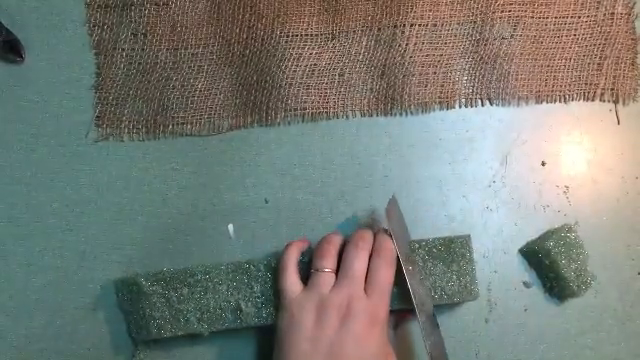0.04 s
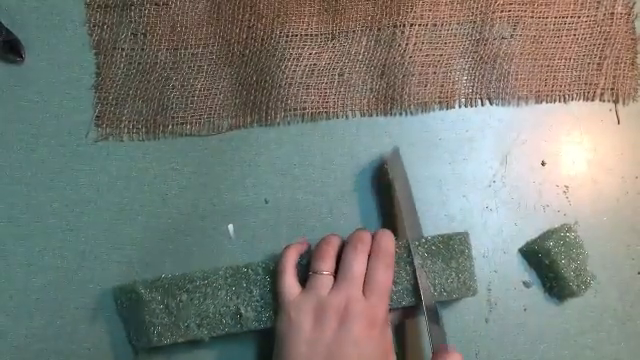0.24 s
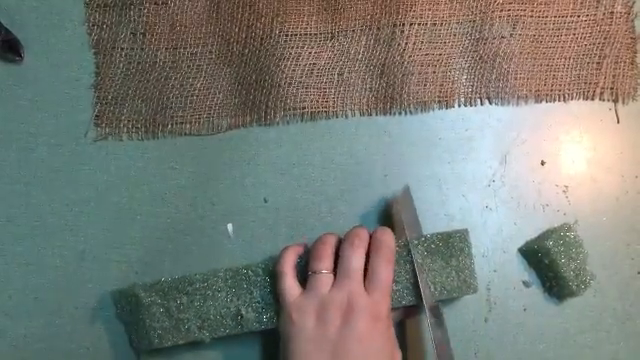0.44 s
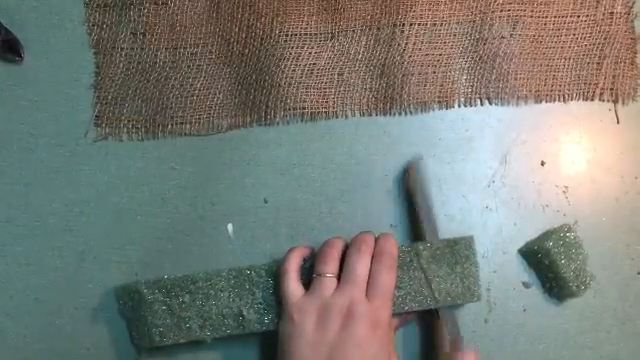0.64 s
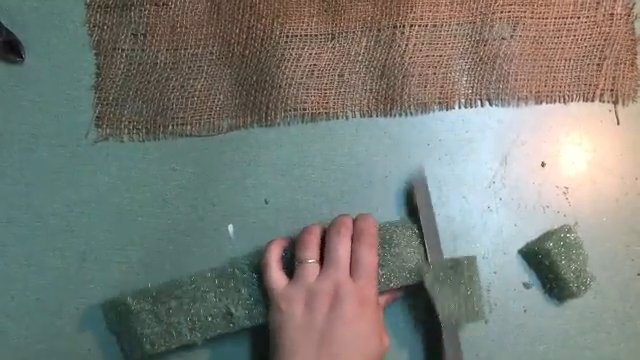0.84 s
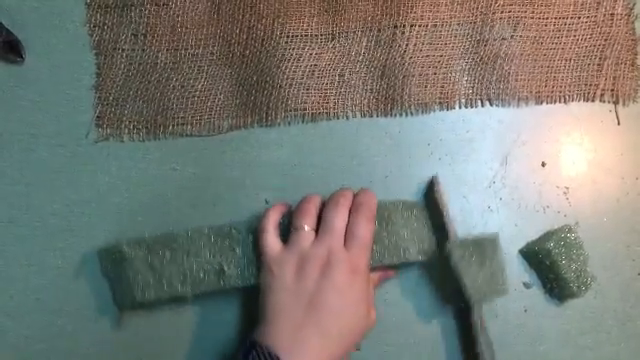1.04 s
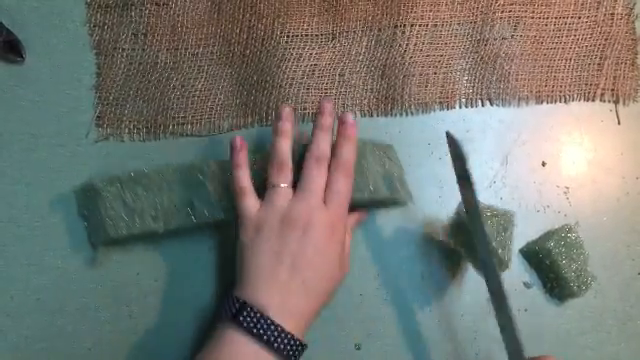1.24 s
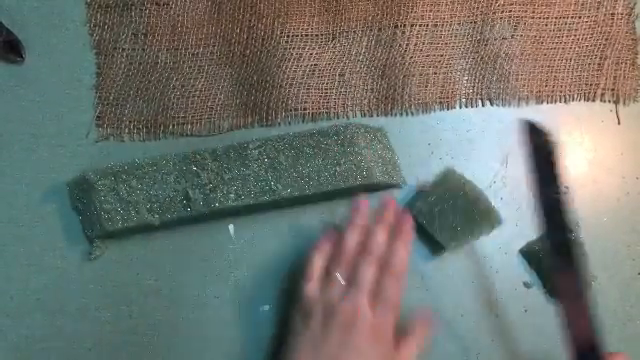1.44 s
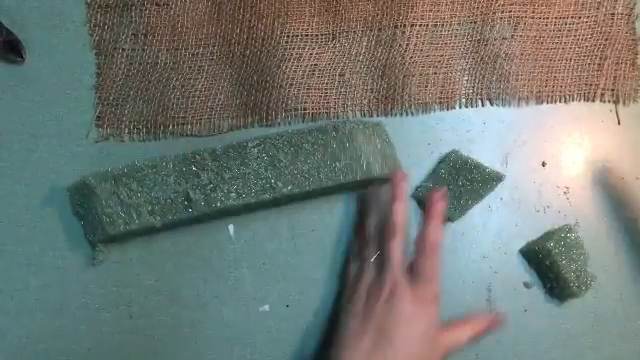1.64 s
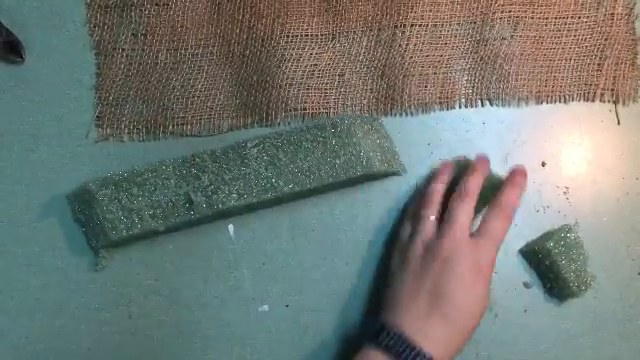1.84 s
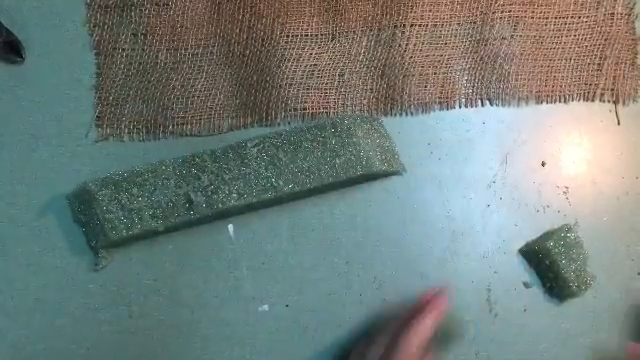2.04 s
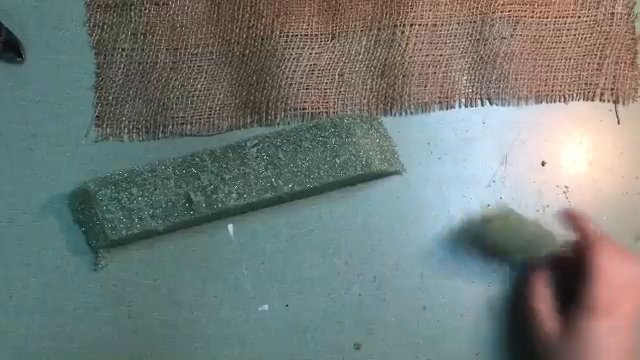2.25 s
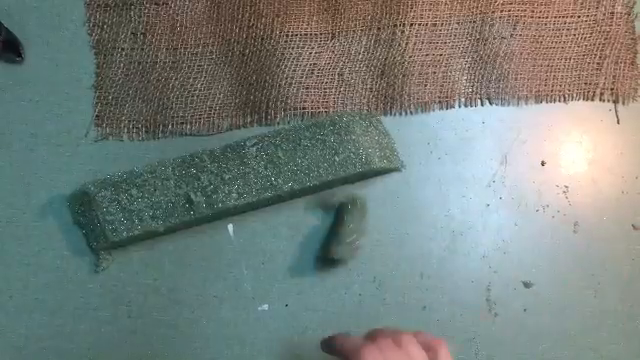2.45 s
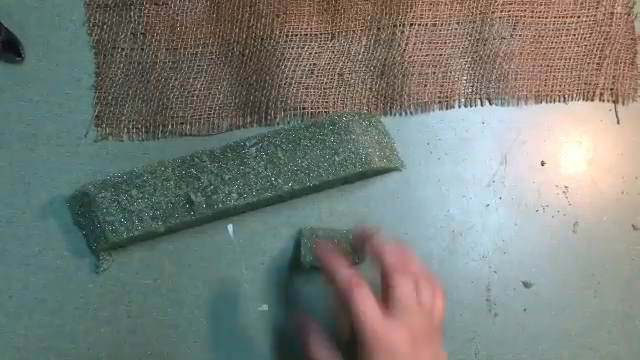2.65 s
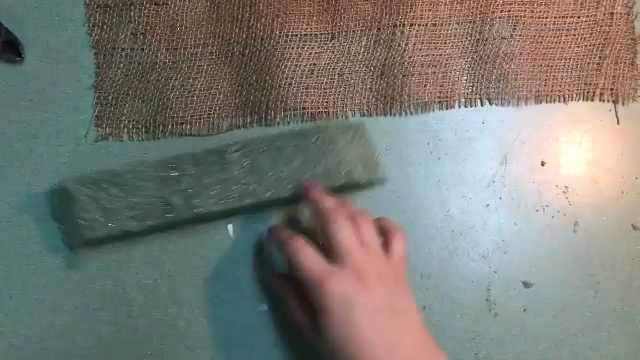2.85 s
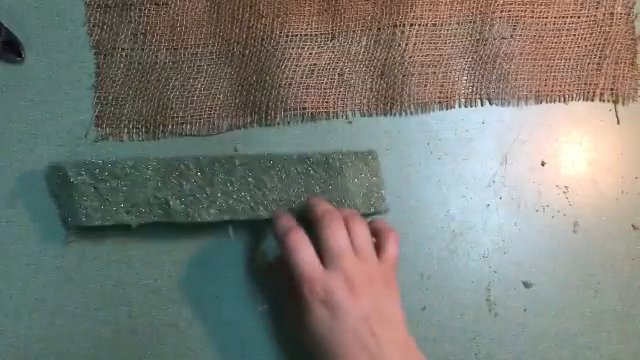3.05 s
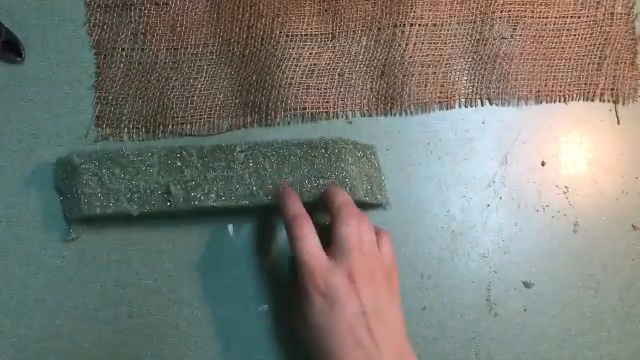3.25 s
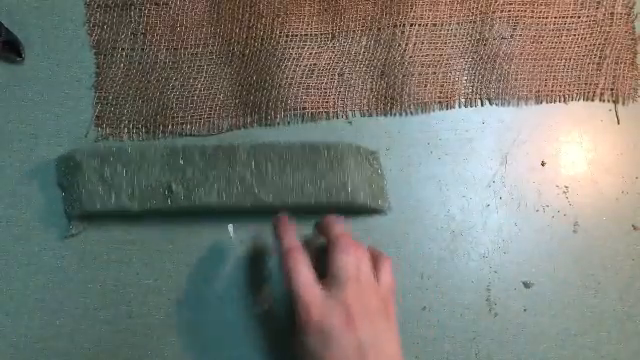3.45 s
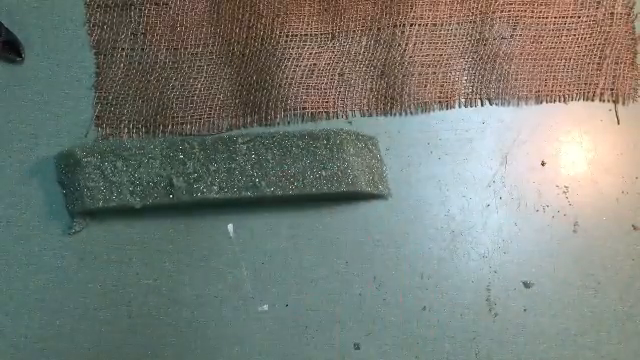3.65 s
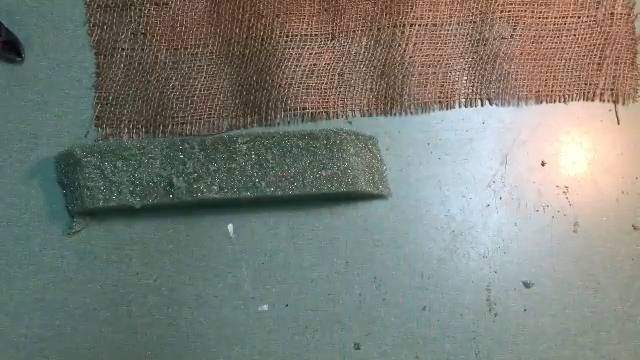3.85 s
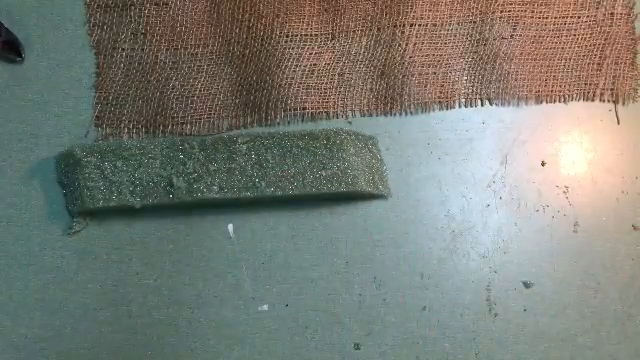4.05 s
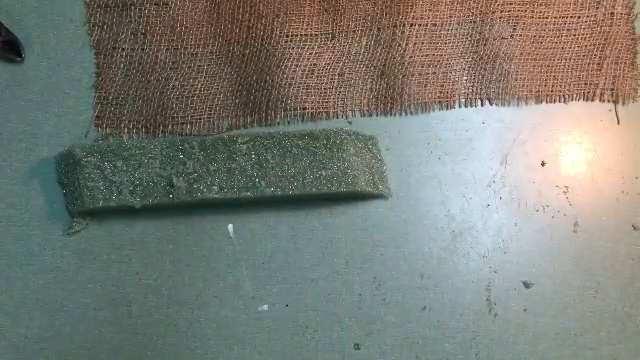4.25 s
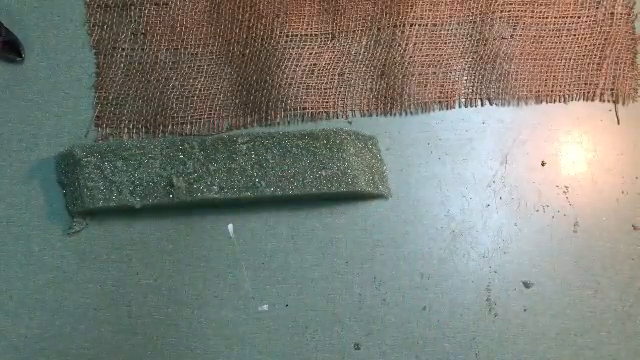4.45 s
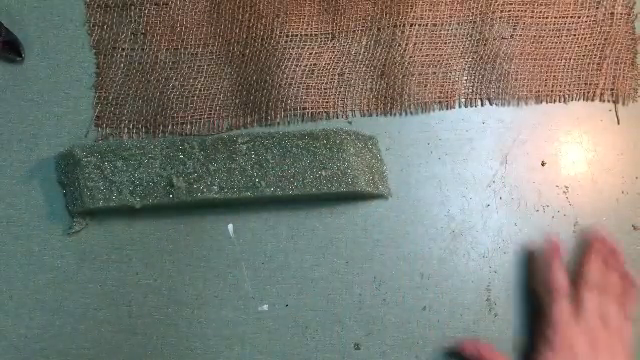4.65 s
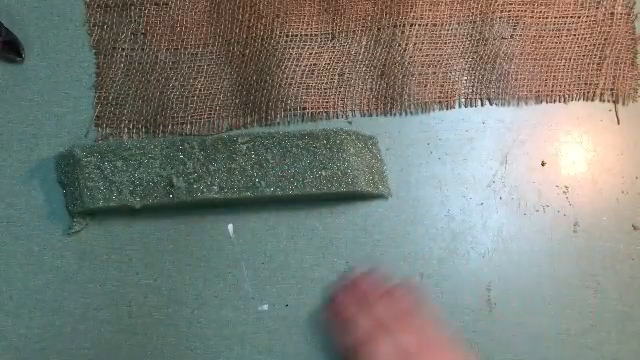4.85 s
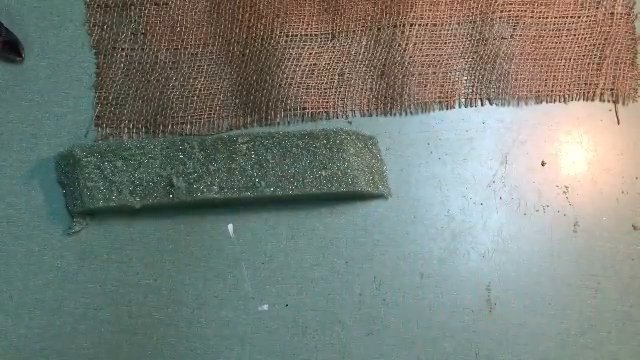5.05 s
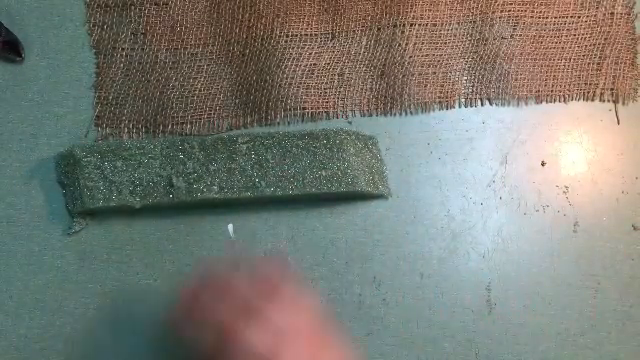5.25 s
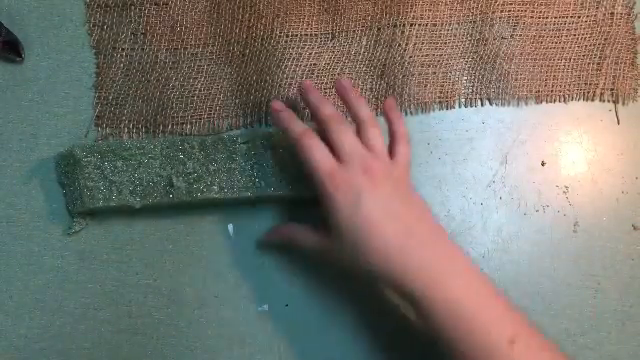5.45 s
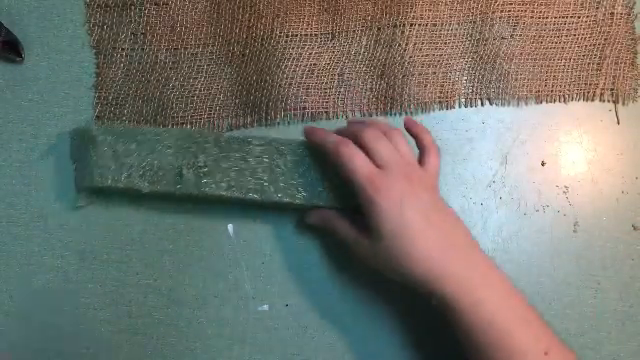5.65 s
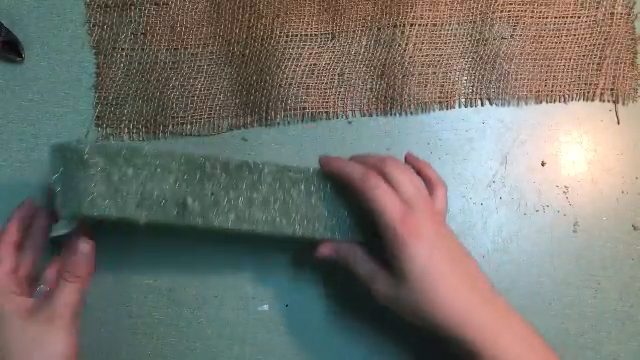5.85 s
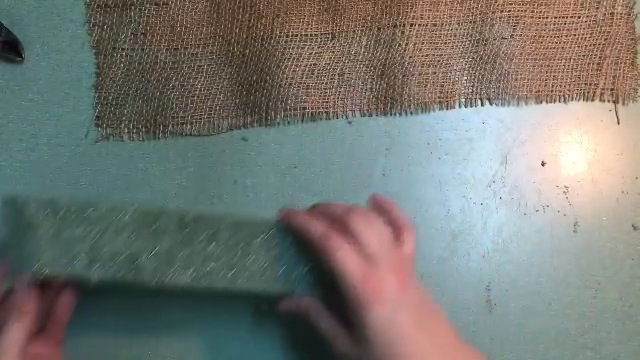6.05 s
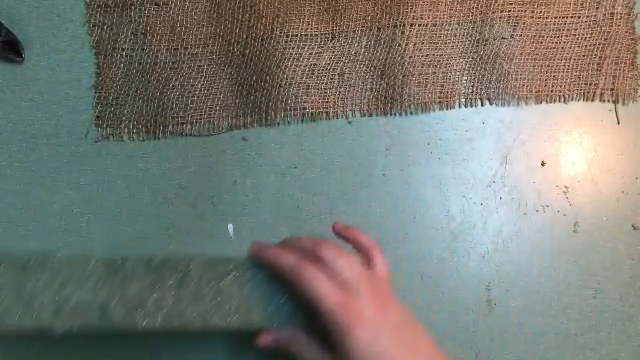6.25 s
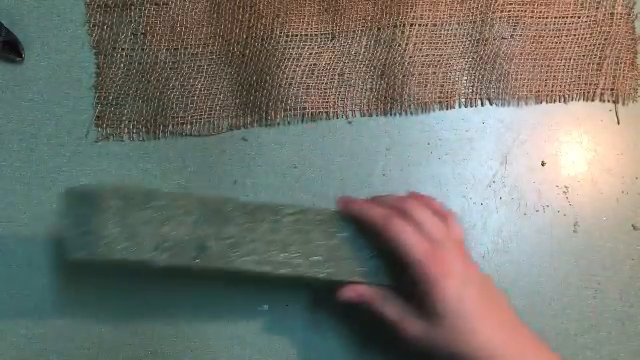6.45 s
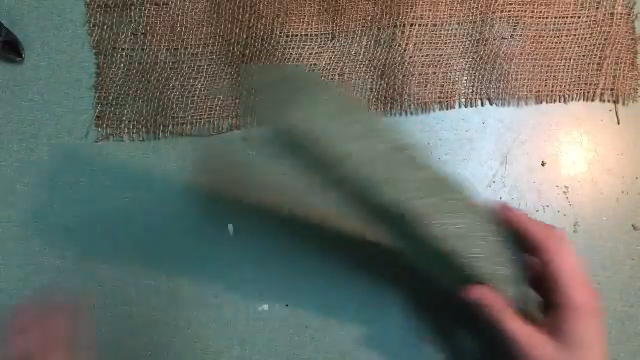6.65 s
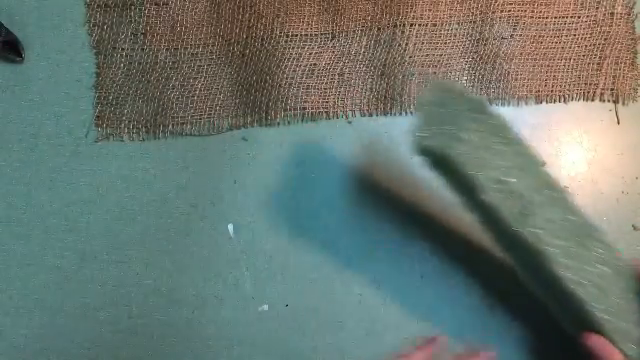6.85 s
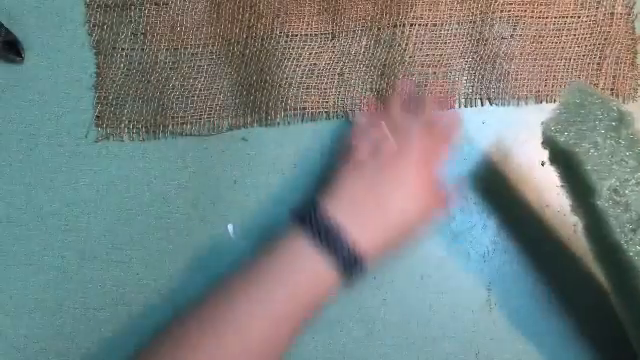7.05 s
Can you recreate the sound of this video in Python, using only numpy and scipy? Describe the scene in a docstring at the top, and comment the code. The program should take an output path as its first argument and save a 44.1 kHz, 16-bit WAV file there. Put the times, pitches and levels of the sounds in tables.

```python
"""A serrated knife saws through brittle craft foam on a table, close to the microphone in a quiet room:
bursts of noise for breaking cells crackle and sound the cut faces and the whole block, over a shaking table.
Room tone runs throughout and dips briefly after one second. Small hard taps ring, first near 1.8 s.
Just after 2 s the knife drops and rattles to rest: ringing modes of handle and blade, with noise scrapes.
Then hands sweep crumbs, slide pieces and bump the table: more foam noise, and decaying low sines."""
import sys
import numpy as np
from scipy import signal
from scipy.fft import rfft, irfft, next_fast_len
from scipy.io import wavfile
from scipy.ndimage import uniform_filter1d, map_coordinates

SR = 44100
rng = np.random.default_rng(int(sys.argv[2]) if len(sys.argv) > 2 else 0)


def output_pcm(signal):
    """Save a mono or channel-first signal as 16-bit PCM at the path in sys.argv[1].

    Samples are clipped to [-1, 1] before scaling.
    """
    pcm = np.clip(np.atleast_2d(signal).T, -1, 1) * 32767
    wavfile.write(sys.argv[1], SR, np.round(pcm).astype(np.int16))


N = 313551  # samples

# the dropped knife's main contacts, relative levels:
# (time [s], handle level [dB], blade level [dB], scrape level [dB])
DROP_CONTACTS = [(2.036, -53.5, -44, -36.5), (2.103, -11.5, -39, -24.5), (2.111, -27, -48.5, -41),
                 (2.142, -35, -21, -26), (2.147, -29, -16.5, -28.5), (2.151, -20.5, -38, -31),
                 (2.173, -23.5, -54.5, -49.5)]
# spectrum of the shaken table top: (frequency [Hz], density [dB per Hz])
TABLE_SPECTRUM = [(18, -51.5), (30, -17), (53, -18.5), (86, 3.5), (130, -2), (189, -1), (444, -7),
                  (600, -5.5), (780, -30), (1320, -120)]


def amp(db):
    """Gain of a level in dB."""
    return 10 ** (np.asarray(db) / 20)


def unit(x):
    """Scaled to rms 1."""
    return x / np.sqrt(np.mean(x ** 2) + 1e-20)


def along(points, hz):
    """Values at hz, read from (Hz, value) points on a log frequency axis."""
    f, values = np.transpose(points)
    return np.interp(np.log(hz + 1), np.log(f + 1), values)


def curves(rows):
    """One value per sample for each column after the time."""
    times, *columns = np.transpose(rows)
    return [np.interp(np.arange(N) / SR, times, column) for column in columns]


def wobble(rate):
    """A smooth random curve, rate knots a second."""
    knots = rng.standard_normal(int(N * rate / SR) + 4)
    return map_coordinates(knots, [np.arange(N) * rate / SR])


def colour(x, spectrum):
    """Causal minimum-phase filter of unit energy with the given spectrum."""
    size = 4096
    level_db = np.maximum(along(spectrum, np.fft.rfftfreq(size, 1 / SR)), -70)
    cepstrum = irfft(np.log(amp(level_db)))
    # folding the cepstrum forward puts the energy as early as possible
    cepstrum[1:size // 2] *= 2
    cepstrum[size // 2 + 1:] = 0
    kernel = irfft(np.exp(rfft(cepstrum)))
    return signal.fftconvolve(x, kernel / np.linalg.norm(kernel))[:len(x)]


def grit(rate, spread_db, t60, smooth):
    """Noise in bursts: each of rate cells a second breaks sharply and dies fast, over a smooth hiss."""
    draw = rng.random((2, N))
    strength = amp(-spread_db * np.log(draw[1] + 1e-4))
    cells = (draw[0] < rate / SR) * strength
    bursts = signal.lfilter([1], [1, -amp(-60 / (t60 * SR))], cells)
    return unit((unit(bursts) + smooth) * rng.standard_normal(N))


def ring(modes, t, scatter_db):
    """Sum of decaying sines: the modes of a struck body, each at a new random strength."""
    total = np.zeros(len(t))
    for hz, db, t60 in modes:
        level_db = db + scatter_db * rng.standard_normal()
        total += amp(level_db - 60 * t / t60) * np.sin(2 * np.pi * hz * t)
    return total


def patchy(x, depth_db):
    """Random gain over patches of time and frequency, so the texture keeps changing."""
    z = signal.stft(x, nperseg=512)[2]
    field = rng.standard_normal(z.shape)
    field = uniform_filter1d(field, size=3, axis=0)  # across frequency
    field = uniform_filter1d(field, size=8, axis=1)  # across time
    gain = amp(depth_db * unit(field))
    return signal.istft(z * unit(gain), nperseg=512)[1][:len(x)]


def room(x):
    """The walls' answer: a noise tail in which each frequency dies at its own speed."""
    # decay of the room: (frequency [Hz], t60 [s])
    wall_decay = [(150, 0.37), (1500, 0.32), (5000, 0.063), (14000, 0.31)]
    hz, t, z = signal.stft(rng.standard_normal(SR // 2), SR, nperseg=256)
    decay = amp(-60 * t / along(wall_decay, hz)[:, None])
    tail = signal.istft(z * decay, SR, nperseg=256)[1]
    delayed = np.pad(x, (200, 0))  # samples before the answer
    return signal.fftconvolve(delayed, tail / np.linalg.norm(tail))[:N]


def room_tone():
    """The quiet room: coloured noise at a gently wavering level that dips briefly."""
    # spectrum of the room tone: (frequency [Hz], density [dB per Hz])
    air_spectrum = [(15, -41), (25, -6.5), (139, -2), (244, -11), (396, -10), (532, -15.5), (817, -19),
                    (2390, -23.5), (2590, -28), (3210, -24.5), (10400, -35), (12900, -32), (15200, -44.5)]
    # brief dip of the room tone: (time [s], level [dB])
    dip = [(0, 0), (1.0, 0), (1.12, -6), (1.3, -6), (1.37, -20), (1.42, -16), (1.47, 0)]
    level_db = -66.8 + curves(dip)[0] + 1.1 * wobble(12.0)
    return amp(level_db) * colour(rng.standard_normal(N), air_spectrum)


def contact_db():
    """Levels of crackle, cut faces and block: each movement against the foam rises, holds and falls."""
    # movements of blade, hand or piece against the foam, relative levels: (start [s], rise [s], hold [s],
    # fall [s], crackle level as the hold starts [dB], crackle level as it ends [dB],
    # cut faces over crackle [dB], whole block over crackle [dB])
    rubs = [(0, 0.00058, 0.1, .02, -58, -53, 2.5, -11.5), (.088, 0.0038, .001, 0.054, -38, -36.5, 1, -3),
            (0.157, 0.0082, 0.074, 0.049, -31, -22.5, 3.5, -9),
            (0.198, 0.065, 0.16, 0.058, -22, -19.5, 1, -7.5),
            (.46, 0.022, 0.053, .02, -55, -50.5, 3.5, -13), (0.529, 0.011, .001, .04, -25.5, -36, 1, -11),
            (.535, 0.01, 0.064, 0.22, -38, -34, -1.5, -11),
            (0.721, 0.0052, 0.026, 0.023, -55, -20.5, 5.5, -12),
            (0.738, 0.015, 0.031, 0.026, -20, -14.5, -3, -6.5),
            (.765, 0.028, 0.099, .04, -15, -15.5, -1.5, -7.5), (.92, 0.016, 0.046, .02, -39.5, -39, 3, -12),
            (.97, 0.027, .001, 0.057, -23.5, -23.5, -2.5, -13),
            (1.0, .03, 0.037, 0.087, -34.5, -29.5, -3, -9), (1.09, 0.019, .001, 0.11, -27, -32.5, 3.5, -24),
            (1.109, 0.044, 0.11, 0.16, -32.5, -37, 2.5, -18),
            (1.26, 0.028, 0.15, 0.089, -37, -48.5, -3, -27),
            (1.458, .034, 0.00089, 0.027, -37.5, -49, 2.5, -0.5),
            (1.499, 0.0072, 0.25, 0.041, -64, -65.5, -4, -6.5),
            (1.73, 0.022, .001, .016, -41.5, -48, -17, -27.5),
            (1.77, 0.032, 0.00091, 0.011, -51, -48, -19.5, -22),
            (1.795, 0.018, 0.0011, 0.017, -41.5, -45, 5, -14.5),
            (1.81, 0.02, 0.13, 0.034, -54.5, -69, 1, -12.5), (1.941, 0.042, .044, .02, -45, -52.5, -4, -13),
            (2.028, 0.011, .022, 0.13, -21, -35.5, -6.5, -19),
            (2.262, 0.013, 0.0055, .02, -48.5, -48.5, -13.5, 0.5),
            (2.297, .01, .012, 0.049, -44, -48.5, -17, -9.5),
            (2.35, 0.0093, 0.0069, .03, -32, -41, -14, -27),
            (2.38, 0.0072, 0.015, 0.035, -27, -36, -4, -14.5),
            (2.44, 0.081, 0.00089, .012, -50, -49.5, -7, -20.5),
            (2.52, 0.05, 0.00095, 0.067, -45, -47, -1.5, -12.5),
            (2.56, 0.05, 0.12, 0.18, -50, -59, -13, -26.5),
            (2.955, .011, 0.06, 0.17, -48, -44.5, -6.5, -25.5),
            (3.1, 0.1, .001, 0.063, -51.5, -48.5, -1, -12.5),
            (3.2, 0.055, 0.059, 0.11, -41.5, -52, -2, -15.5), (3.4, 0.056, 0.08, 0.18, -49.5, -50, -8, -28),
            (3.6, 0.032, 0.093, 0.045, -60.5, -53, -5.5, -27),
            (3.875, 0.038, 0.063, 0.056, -59.5, -52.5, -14, -29.5),
            (4.244, 0.019, .2, 0.053, -61, -77, -5, -11), (4.468, 0.028, .001, 0.14, -58.5, -60, 2, -13),
            (4.64, 0.063, 0.0012, 0.093, -62, -62, -0.5, -14),
            (4.75, 0.038, .08, .05, -59.5, -63, 0.5, -15),
            (4.85, 0.031, 0.14, 0.13, -60, -55.5, 4.5, -17.5),
            (5.0, 0.037, 0.12, 0.09, -56, -61.5, -0.5, -10), (5.5, 0.045, .001, .06, -77, -79.5, 17, 14),
            (5.638, 0.029, 0.00095, 0.033, -62.5, -60.5, 7, -10.5),
            (5.716, 0.026, 0.17, 0.023, -45.5, -55.5, -2, -21),
            (5.9, 0.047, .06, 0.058, -66, -72.5, -3.5, -6),
            (6.035, 0.068, 0.0011, 0.076, -58, -61.5, 3.5, -9),
            (6.154, 0.049, 0.075, .03, -39.5, -48, -3.5, -17),
            (6.26, 0.029, .001, 0.066, -34, -34, -1.5, -21),
            (6.4, 0.098, .001, 0.059, -62.5, -64.5, -10.5, -16.5),
            (6.73, 0.038, 0.00092, 0.042, -51.5, -51, -9, -20), (6.799, 0.1, .001, .02, -60, -59, -20, -22),
            (6.916, 0.036, .001, 0.15, -58, -56.5, -5, -27.5)]
    ramp_db = 30  # how far a rise climbs and a fall drops
    t, power = np.arange(N) / SR, np.full((3, N), 1e-12)
    for start, rise, hold, fall, first_db, last_db, faces_db, block_db in rubs:
        knots = np.cumsum([start, rise, hold, fall])
        a, b = int(start * SR), int(knots[-1] * SR)
        crackle_db = np.interp(t[a:b], knots, [first_db - ramp_db, first_db, last_db, last_db - ramp_db])
        power[:, a:b] += amp(crackle_db + np.array([[0], [faces_db], [block_db]])) ** 2
    return 10 * np.log10(power)


def foam(contact):
    """Breaking cells crackle in the air and sound the cut faces and block; single snaps stand out."""
    # breaking cells and pieces ticking on the table, relative levels:
    # (time [s], crackle level [dB], cut-face level [dB], whole-block level [dB])
    snap_list = [(.0655, -49.5, -40, -49), (0.0931, -11, -20, -26), (0.1081, -18, -22, -26),
                 (0.1631, -9, -16, -24.5), (0.177, -11, -14, -31), (0.1903, -9, -19, -35),
                 (0.1995, -4.5, -11, -20.5), (0.2136, -2, -15, -21), (0.2296, -5, -9.5, -19.5),
                 (0.2575, -10, -12, -31), (.2705, -17, -13, -37), (0.3242, -11, -15, -11),
                 (0.3424, -6, -17, -16), (.3587, -3.5, -11.5, -36), (.385, -4, -18, -36),
                 (0.4179, -26, -33, -28), (0.4356, -9, -33, -36), (0.4559, -11.5, -26, -34),
                 (0.5084, -41, -33, -55), (0.54, -11, -24.5, -38), (0.7093, -28.5, -34, -52),
                 (0.7285, -18, -26, -42), (0.7554, -6, -38, -32), (.8828, 3.5, -1, -34),
                 (0.8975, 2.5, -7, -15), (0.9537, -32, -39, -45), (0.9975, -8.5, -43, -35),
                 (1.0626, -22, -36, -30), (1.112, -12.5, -16, -37), (1.1189, -22.5, -19.5, -47),
                 (1.27, -29, -39, -47), (1.3038, -31.5, -56, -34), (1.4028, -22, -37, -60),
                 (1.4888, -28, -29.5, -21), (1.5379, -28.5, -43, -33), (1.5856, -33, -51, -37.5),
                 (1.6016, -28, -48, -39), (1.6313, -36, -64, -73), (1.6638, -37, -38, -31),
                 (1.7518, -31, -48.5, -65.5), (1.8115, -20.5, -32.5, -54.5), (1.9904, -24.5, -38, -45),
                 (2.0355, -17, -35, -59), (2.389, -23, -31, -31.5), (2.5066, -27, -44, -32.5),
                 (2.556, -36, -33, -30), (2.582, -21, -31, -49), (2.5911, -24, -41, -71),
                 (2.6277, -29, -71.5, -73), (2.6956, -33.5, -63, -66), (2.7357, -36.5, -52.5, -74),
                 (2.966, -35, -37, -50), (3.0161, -23.5, -49, -62), (3.2681, -25, -32, -51),
                 (3.3007, -29.5, -41.5, -60.5), (3.4553, -41, -41, -65.5), (3.5099, -27.5, -56, -56),
                 (3.5206, -33, -58.5, -71), (3.6475, -32.5, -57.5, -72), (3.9093, -37.5, -52.5, -68.5),
                 (3.93, -41.5, -54, -58), (4.0682, -46.5, -67.5, -73.5), (4.2654, -45, -69.5, -46),
                 (4.3015, -49, -69.5, -45.5), (4.4975, -39.5, -59, -69), (4.798, -52, -50, -68),
                 (4.941, -45, -46, -74), (4.9528, -36.5, -42.5, -66), (5.0198, -47.5, -41, -61),
                 (5.5544, -64.5, -71, -55.5), (5.6664, -47.5, -52.5, -61.5), (5.7337, -43, -46, -54),
                 (5.7717, -27, -49.5, -56), (5.877, -35, -56, -66.5), (5.901, -32.5, -49.5, -63),
                 (6.206, -27.5, -46, -48), (6.2835, -22.5, -35, -54.5), (6.296, -28, -44, -58),
                 (6.299, -30, -45, -50.5), (6.5974, -49, -73, -72.5), (6.765, -37.5, -59, -67),
                 (6.8985, -44, -59.5, -71)]
    # spectrum of the crackle in the air: (frequency [Hz], density [dB per Hz])
    crackle_spectrum = [(2350, -35), (4000, -8), (7230, -2), (7840, -4.5), (9380, -0.5), (10400, -4.5),
                        (11800, -1.5), (14900, -5), (16000, -8)]
    # spectrum of the cut faces: (frequency [Hz], density [dB per Hz])
    face_spectrum = [(940, -25.5), (1600, -2), (2580, 0), (3440, -5.5), (3830, -8), (4500, -13),
                     (5850, -49.5), (9900, -120)]
    # spectrum of the whole block: (frequency [Hz], density [dB per Hz])
    block_spectrum = [(320, -42.5), (550, -22), (640, -12.5), (983, -2.5), (1440, -2), (1600, -8),
                      (2080, -22.5), (3520, -120)]
    snap_t60, stick_db, stick_s = .013, 5.5, 0.0074  # snap decay [s]; hush before it: depth and time constant
    levels_db = contact.copy()
    snaps, t = np.zeros((3, N + SR)), np.arange(SR // 8) / SR
    for s, crackle_db, faces_db, block_db in snap_list:
        at = round(s * SR)
        burst = amp(-60 * t / snap_t60) * rng.standard_normal(len(t))
        burst[0] = 2.5  # the break itself is a single sharp push
        snaps[:, at:at + len(t)] += amp([[crackle_db - 8], [faces_db - 3.0], [block_db - 4.5]]) * burst
        # the contact sticks, then lets go: time runs backwards from the snap
        before = levels_db[:, :at][:, ::-1][:, :len(t)]
        before -= stick_db * np.exp(-t[:at] / stick_s)
    uneven = amp(0.33 * wobble(40))  # the pressure of the hand is never steady
    cells = grit(rate=420, spread_db=2.8, t60=.007, smooth=1.4)
    inner = grit(rate=200, spread_db=2.0, t60=.018, smooth=1.5)
    parts = amp(levels_db) * uneven * [cells, 0.35 * cells + 0.44 * inner, inner]
    parts = [patchy(x, depth_db=3.0) for x in parts] + snaps[:, :N]
    spectra = (crackle_spectrum, face_spectrum, block_spectrum)
    body = sum(colour(x, spectrum) for x, spectrum in zip(parts, spectra))
    return body + amp(-11) * colour(snaps[2, :N], TABLE_SPECTRUM)  # snaps pass into the table


def table(block_db):
    """The top shudders as noise under the work and the dropped knife, and booms as sines when bumped."""
    # dull bumps, relative levels: (time [s], level [dB], frequency [Hz], t60 [s])
    bumps = [(2.038, -36.5, 310, 0.11), (2.1, -34, 97.7, .4), (2.101, -29, 152, 0.17),
             (2.146, -35, 254, 0.14), (3.251, -48, 123, 0.35), (3.63, -46.5, 127, 0.19),
             (4.614, -51, 328, 0.16), (4.66, -47, 91.3, 0.28), (4.687, -33, 92.8, 0.21),
             (4.708, -37.5, 90, 0.17), (4.728, -43.5, 94, 0.17), (4.791, -46, 111, 0.29),
             (4.7, -41, 279.6, 0.059), (5.0, -57.5, 69.3, 0.49), (5.073, -41, 216.4, 0.25),
             (5.941, -49.5, 75, 0.14), (6.192, -52, 394, 0.13), (6.949, -35.5, 91, 0.18),
             (7.025, -48, 110, 0.14)]
    out, t = np.zeros(N + SR), np.arange(SR // 2) / SR
    rise = 1 - np.exp(-t / .004)
    for s, db, hz, t60 in bumps:
        out[round(s * SR):][:len(t)] += amp(db - 60 * t / t60) * np.sin(2 * np.pi * hz * t) * rise
    # the shake follows the level of the whole block, less steeply
    shake = uniform_filter1d(amp(-26 + 0.67 * block_db), size=SR // 40)
    shudder_db, shudder_t60 = -25, 0.52  # after a blow: level over the handle [dB], decay [s]
    for s, handle_db, *_ in DROP_CONTACTS:
        shake[round(s * SR):][:len(t)] += amp(handle_db + shudder_db - 60 * t / shudder_t60)
    return out[:N] + shake * colour(rng.standard_normal(N), TABLE_SPECTRUM)


def clinks():
    """Something small and hard is tapped: each tap rings a few short high modes."""
    # taps, relative levels: (time [s], level [dB])
    taps = [(1.8103, -38.5), (2.3874, -25), (2.3964, -33), (2.7343, -45), (3.9083, -46)]
    # modes of the small hard thing: (frequency [Hz], level [dB], t60 [s])
    tap_modes = [(4116, -2, 0.046), (4300, -9, .04), (4560, -17, .06)]
    out, t = np.zeros(N), np.arange(SR // 5) / SR
    rise = 1 - np.exp(-t / 0.00084)
    for s, db in taps:
        out[round(s * SR):][:len(t)] += amp(db) * ring(tap_modes, t, scatter_db=3.5) * rise
    return amp(3.5 * wobble(250)) * out  # it chatters as it rings


def knife():
    """Each contact knocks handle and table, rings the blade and scrapes; the knocks linger in the room."""
    # modes of the blade: (frequency [Hz], level [dB], t60 [s])
    blade_modes = [(4587, -16, .2), (5000, -26, .1), (5453, -11, .16), (5819, -11, .19), (6368, -16, .16),
                   (6842, -10, .1), (7300, -22, .08), (7865, -7, .08), (8958, -18, .16), (9500, -24, .08),
                   (10240, -18, .15), (10700, -24, .1), (11160, -21, .14), (11730, 0, .11),
                   (11990, -3, .13), (12600, -22, .07), (13320, -9, .07), (13660, -15, .15),
                   (14460, -12, .09), (15300, -16, .06)]
    # modes of the handle: (frequency [Hz], level [dB], t60 [s])
    handle_modes = [(509, -11, 0.015), (671.3, -6, 0.059), (826, -1.5, 0.054), (984, -13, 0.012),
                    (1274, -3, 0.042), (1210, 0, 0.025), (1563, -11, 0.012), (1781, -1, 0.016),
                    (2116, 6.5, 0.038), (2160, -9, 0.014), (2636, -6, .03), (3040, -16.5, 0.01),
                    (3220, -9, 0.16), (3600, -20, .02)]
    # spectrum of the table knocked by the handle: (frequency [Hz], density [dB per Hz])
    knock_spectrum = [(260, -53), (450, -25), (560, -3.5), (1020, -10), (1290, 3), (1620, -11),
                      (2070, -3.5), (4000, -17.5), (5200, -48.5), (8800, -120)]
    contacts = list(DROP_CONTACTS)
    for k in range(9):  # the rattle: evenly spaced touches that grow weaker
        s = 2.16 + k * 0.011
        db = -28.5 - 0.88 * k + rng.normal(0, 0.86)
        contacts.append((s, db, db - 21.5, db - 15.5))
    knocks, thud, steel = np.zeros(N), np.zeros(N), np.zeros(N)
    t = np.arange(SR // 3) / SR
    rise = 1 - np.exp(-t / 0.00057)
    for s, handle_db, blade_db, scrape_db in contacts:
        at = round(s * SR)
        bright_noise = np.diff(rng.standard_normal(len(t) + 1))
        scrape = amp(scrape_db - 60 * t / .05) * bright_noise
        blade = amp(blade_db) * ring(blade_modes, t, scatter_db=1.5)
        knocks[at:][:len(t)] += rise * amp(handle_db - 4.5) * ring(handle_modes, t, scatter_db=1.5)
        thud[at:][:len(t)] += amp(handle_db + 3.5 - 60 * t / 0.036) * rng.standard_normal(len(t))
        steel[at:][:len(t)] += rise * (blade + scrape)
    knocks += colour(thud, knock_spectrum)
    chatter = amp(3.5 * wobble(220))  # the blade touches down as it rings
    return knocks + patchy(chatter * steel, depth_db=3.5) + amp(-11.5) * room(knocks)


def scene():
    """Near sounds, their room and the room tone, the same in both channels."""
    contact = contact_db()
    soft = foam(contact)
    mono = room_tone() + soft + amp(-19.0) * room(soft) + table(contact[2]) + clinks() + knife()
    return np.array([mono, mono])


def record(dry):
    """The loudest peaks are rounded off, the deepest bass is weak and the top of the band is cut."""
    rounded = dry / (1 + np.abs(dry / .68) ** 4) ** (1 / 4)
    size = next_fast_len(N + SR // 2)
    hz, bass_hz = np.fft.rfftfreq(size, 1 / SR), 55
    edge = np.sin(np.pi / 2 * np.clip((16100 - hz) / 600, 0, 1)) ** 2  # fades out from 15500 to 16100 Hz
    response = (1j * hz / (bass_hz + 1j * hz)) ** 2 * edge
    return irfft(rfft(rounded, size) * response, size)[:, :N]


dry = scene()
out = record(dry)
output_pcm(out)
```